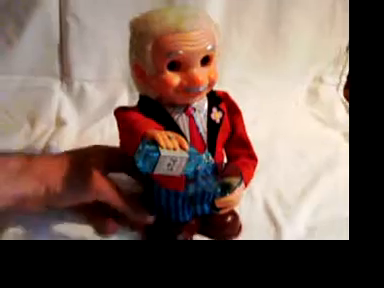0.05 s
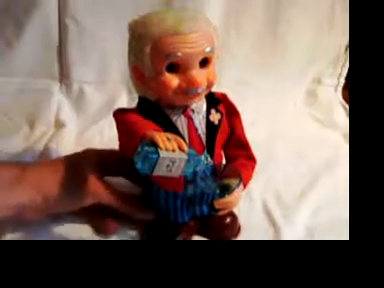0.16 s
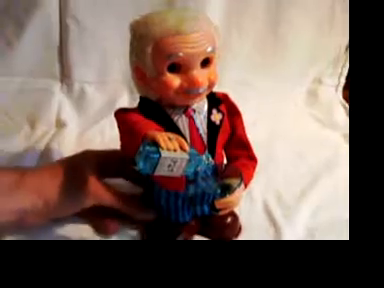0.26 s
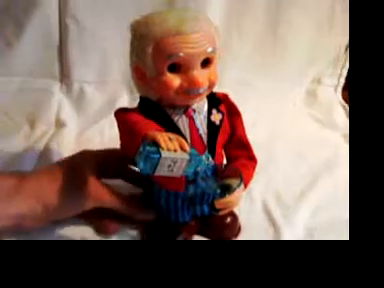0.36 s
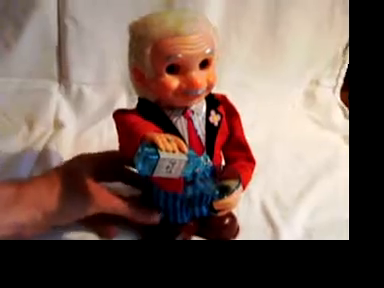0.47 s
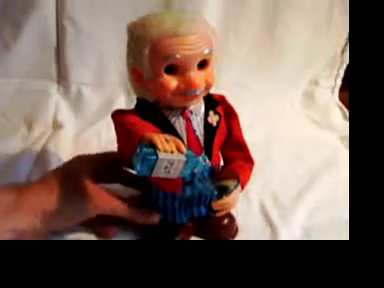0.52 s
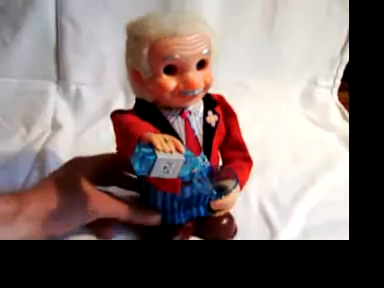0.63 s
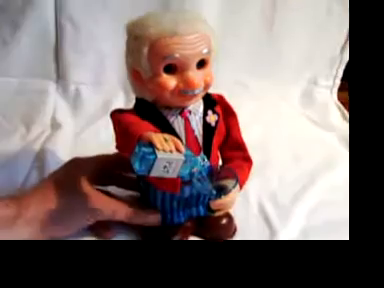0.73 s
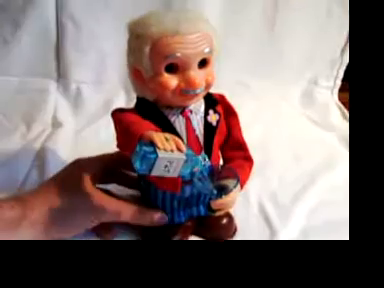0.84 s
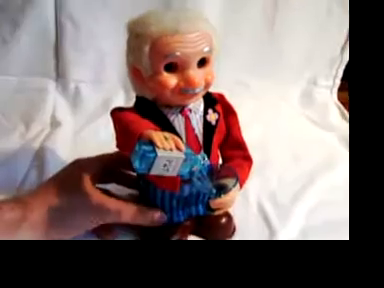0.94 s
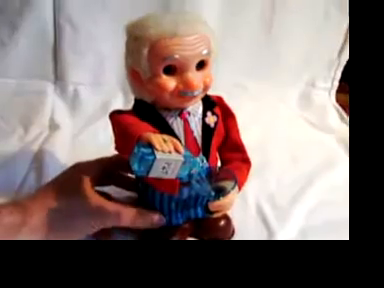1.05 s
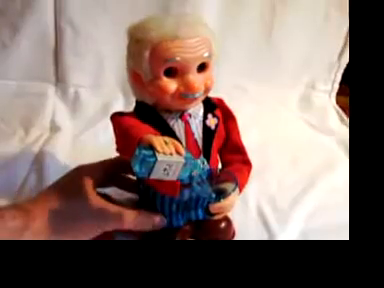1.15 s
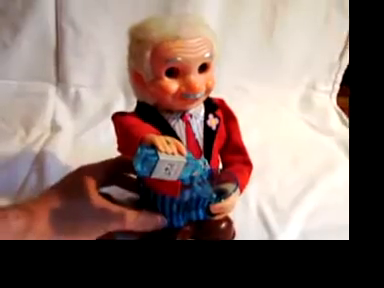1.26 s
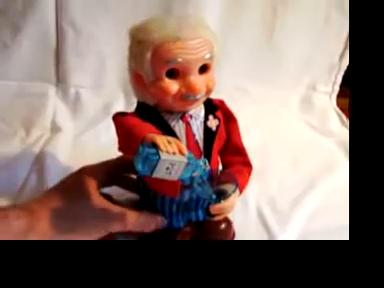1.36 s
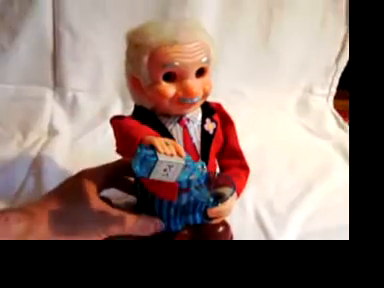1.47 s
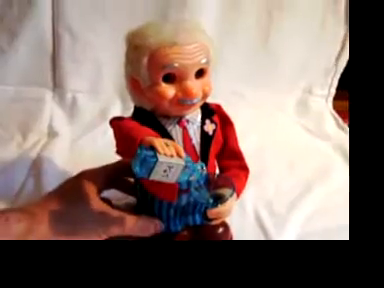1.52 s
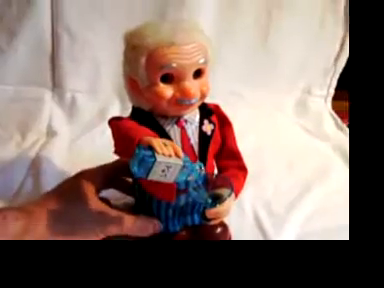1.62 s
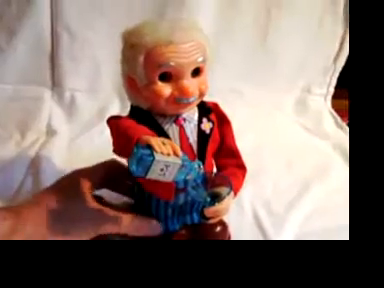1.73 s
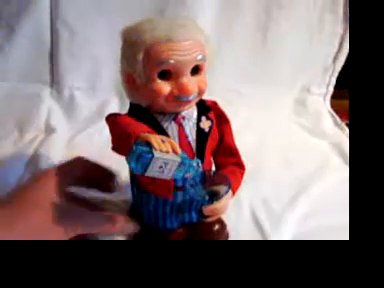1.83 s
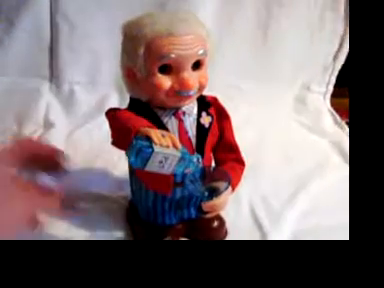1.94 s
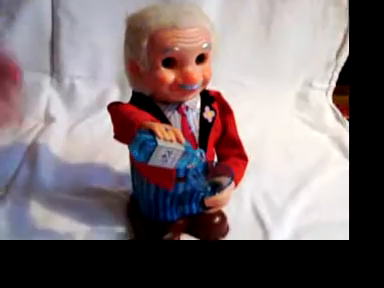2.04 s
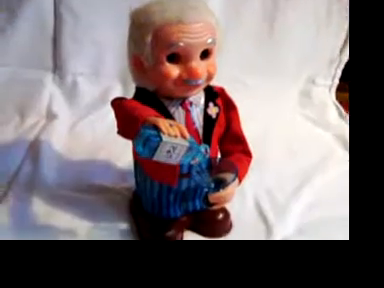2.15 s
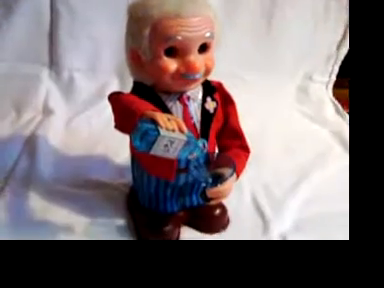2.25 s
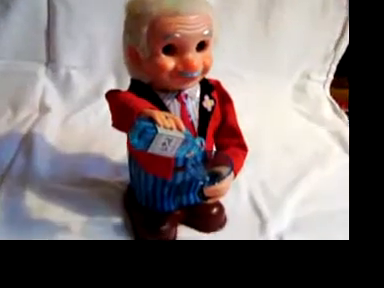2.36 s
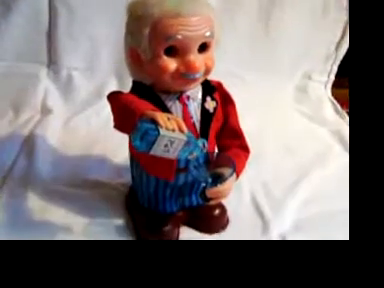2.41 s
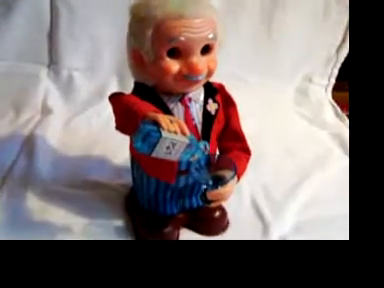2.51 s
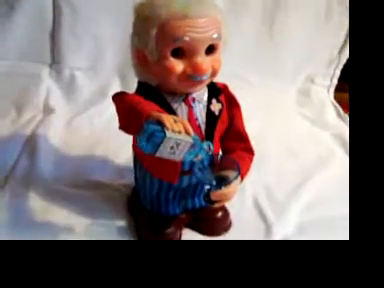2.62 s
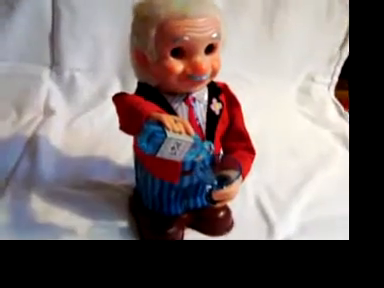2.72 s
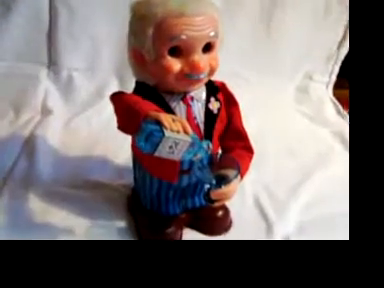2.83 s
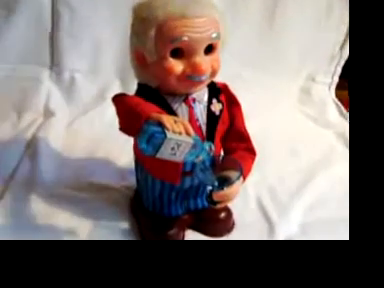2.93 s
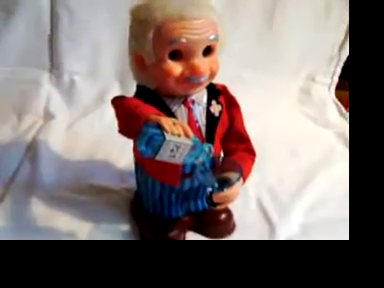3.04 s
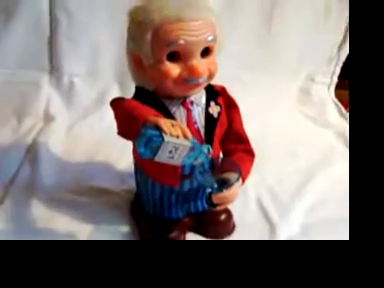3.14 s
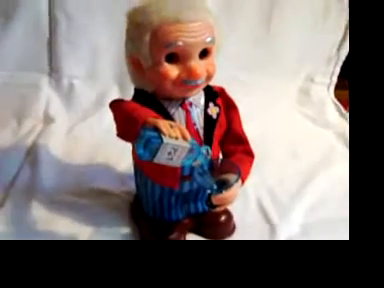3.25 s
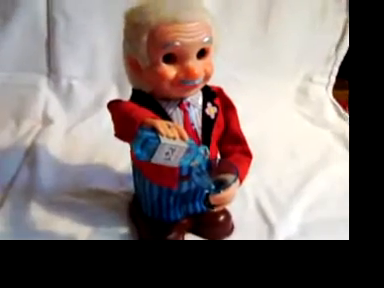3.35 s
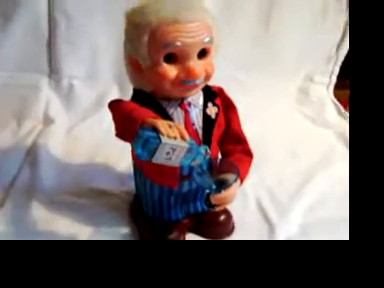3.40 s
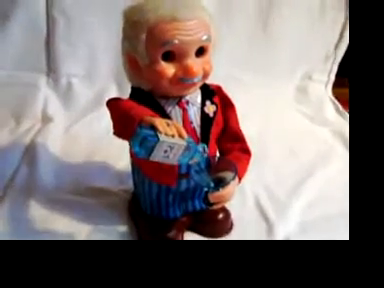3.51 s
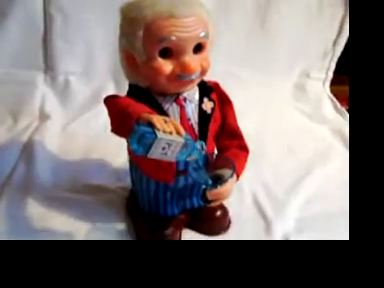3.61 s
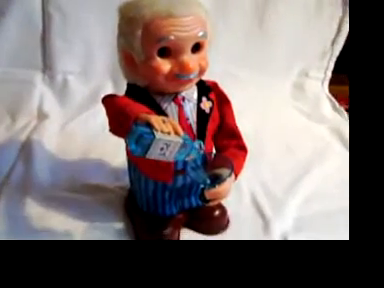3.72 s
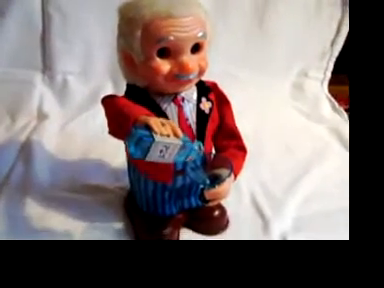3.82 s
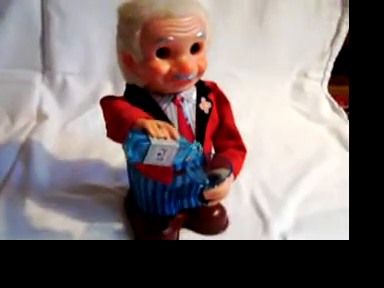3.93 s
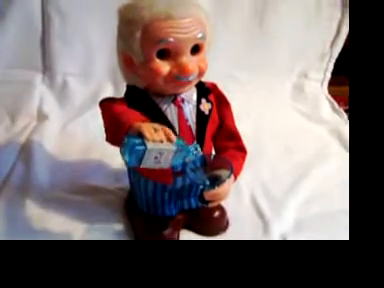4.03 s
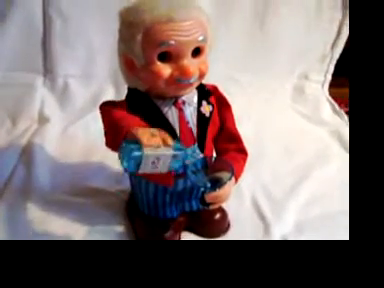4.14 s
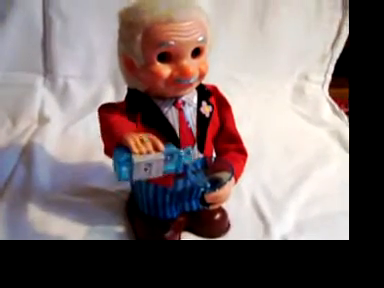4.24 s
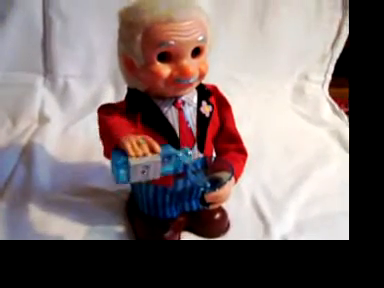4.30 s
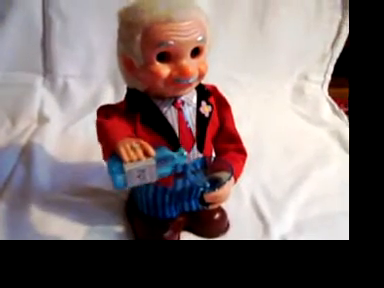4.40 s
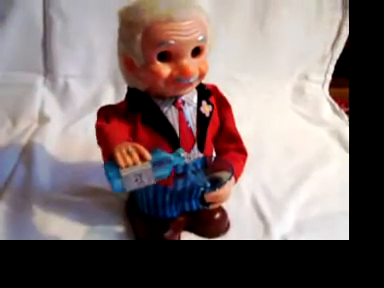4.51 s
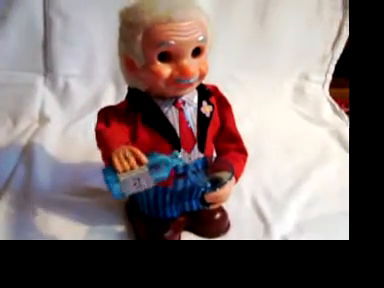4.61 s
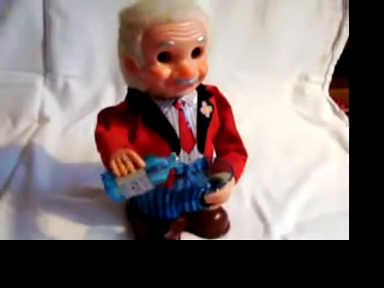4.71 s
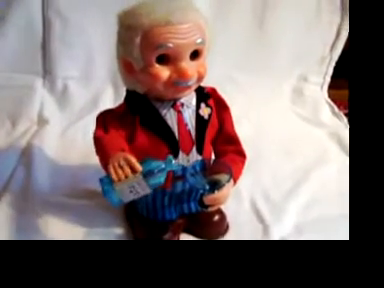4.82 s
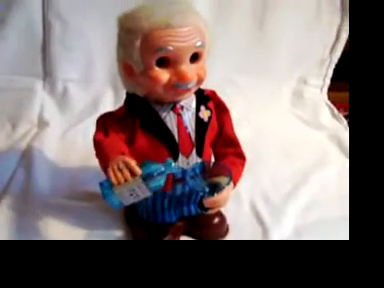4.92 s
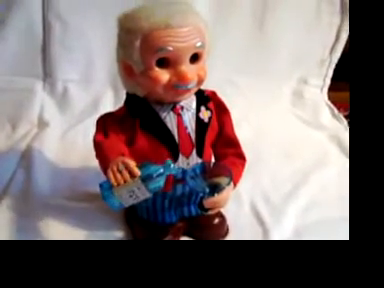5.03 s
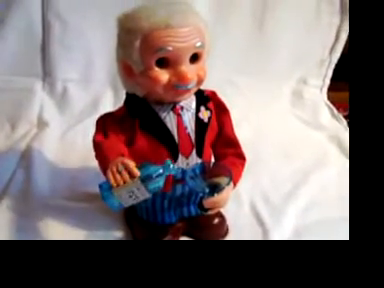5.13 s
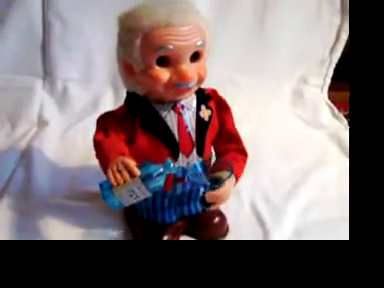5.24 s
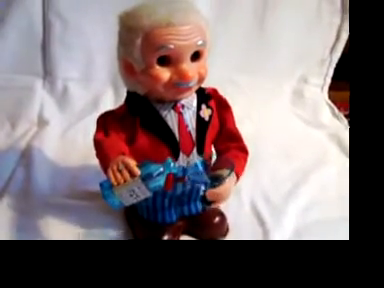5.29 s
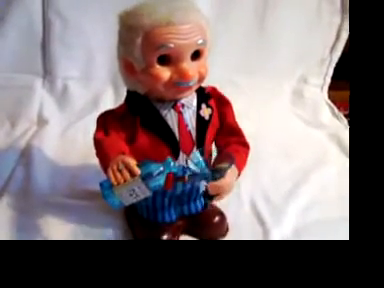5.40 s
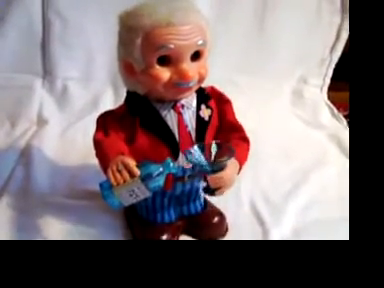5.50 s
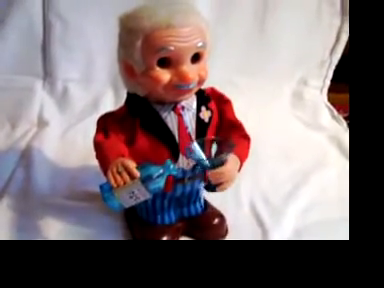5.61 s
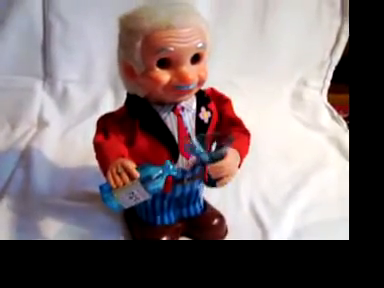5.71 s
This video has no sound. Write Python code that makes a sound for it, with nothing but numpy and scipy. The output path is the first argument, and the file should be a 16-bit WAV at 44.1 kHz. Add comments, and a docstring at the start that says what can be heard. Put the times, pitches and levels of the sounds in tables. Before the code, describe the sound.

A battery-operated tin doll is clicked on and runs with a humming motor, rattling gears and occasional knocks.

```python
"""Quiet room, close up: a hand clicks the switch of a battery-driven tin bartender doll.
The motor spins up; its shaft hums and its loose gears rattle the tin body, slowing and speeding up
with the load of the arms and grinding harder while a cam bears on them. The linkage knocks now and
then. The narrow-band microphone channel overloads on the sharpest peaks."""
import sys
import numpy as np
from scipy import signal
from scipy.fft import rfft, irfft
from scipy.io import wavfile

SR = 44100
rng = np.random.default_rng(int(sys.argv[2]) if len(sys.argv) > 2 else 0)


def log_audio(samples):
    """Write samples as a 16-bit WAV file to the path given in sys.argv[1]."""
    # one column per channel
    frames = np.atleast_2d(samples).T
    # limit to full scale, then quantise
    limited = np.clip(frames, -1, 1)
    pcm = np.round(limited * 32767).astype(np.int16)
    wavfile.write(sys.argv[1], SR, pcm)


N = 254016
TIME = np.arange(N) / SR

# room noise spectrum: f/Hz, relative density/dB
ROOM_SPECTRUM = [(15, -31.5), (25, -9.5), (86, -14.5), (118, -3.5), (156, -8.5), (215, -6), (283, -9.5),
                 (315, -15), (462, -5.5), (610, -8.5), (664, -7.5), (840, -17), (2830, -21), (4060, -32.5),
                 (5280, -56), (8930, -120)]
# finger and switch clicks: t/s, peak/dB, spectral centre/Hz, spread/octaves, scrape decay/s
SWITCH_CLICKS = [(0.526, -11, 2080, 0.58, 0.00029), (0.7120, -37, 1700, 1.3, 0.0018),
                 (0.76, -16, 1330, 0.87, 0.0053), (0.78, -27, 1210, .7, 0.0051),
                 (0.981, -3, 850, 1.57, 0.000082), (0.993, -24, 1000, 1.1, .001),
                 (1.032, -11, 750, 1.55, 0.00071), (1.287, -9, 2040, 0.59, 0.0014)]
# switch plate modes: f/Hz, level/dB, t60/s
SWITCH_MODES = [(627, 2.5, 0.025), (610, -18, 0.19), (850, -23, 0.0028), (1035, 2, 0.007),
                (1636, -0.5, 0.012), (2400, -3.5, 0.0081), (2720, -7.5, 0.013), (3650, -0.5, 0.0056)]
# arm linkage knocks: t/s, thud level/dB, thud f/Hz, thud decay/s, clack level/dB
LINKAGE_KNOCKS = [(1.469, -23, 85, 0.0035, -4), (3.0075, -3, 453, .0025, 5),
                  (3.086, -9.5, 427, 0.0024, -31), (3.174, -11, 356, 0.0021, -26),
                  (3.92, -28, 60, 0.011, -24), (5.052, -11.5, 480, 0.0032, -6)]
# tin body resonances: f/Hz, half width/Hz, level/dB
TIN_MODES = [(186, 81, -28), (406, 122, -20), (544, 110, -8.5), (709, 59, -8), (770, 23, -12.5),
             (934, 200, -16), (1117, 72, -4.5), (1210, 130, -14), (1398, 75, -4.5), (1453, 20, -9.5),
             (1572, 104, -4), (1676, 64, -7), (1793, 71, -3.5), (1909, 46, -1.5), (2040, 23, -3.5),
             (2121, 48, -2.5), (2256, 221, -1.4), (2370, 63, -3.5), (2390, 13, -9.5), (2537, 68, -5),
             (2640, 100, -9.5), (2827, 15, -7), (2920, 234, -9), (3045, 70, -9), (3257, 200, -11),
             (3480, 74, -16), (3656, 160, -13.5), (3898, 223, -15)]
# running speed under the load of the arms: t/s, shaft rate/Hz
SHAFT_SPEED = [(1.44, 187), (1.7, 189.5), (1.82, 182), (2.08, 185), (2.43, 171), (2.67, 198.5), (2.83, 195),
               (3.1, 197), (3.25, 193), (3.57, 195), (3.75, 199), (4.15, 196), (4.5, 198), (4.77, 194),
               (5.0, 182), (5.25, 193), (5.5, 180.5), (5.76, 180.5)]
# shell resonances, one per hum order: level at resonance/dB, f/Hz, half width/Hz
HUM_RESONANCES = [(-34.5, 350, 110), (-30.5, 588, 24), (-30.5, 737, 28), (-28.5, 1348, 32)]
# cam bearing on the gears: start t/s, length/s, boost/dB
CAM_STROKES = [(1.29, 0.46, 1.5), (2.058, 0.24, 1.06), (2.359, 0.19, 1.58), (2.63, 1.73, 1.75),
               (2.647, 0.1, 2.1), (2.944, 0.12, 1.5), (3.763, 0.16, 2.5), (4.345, 0.14, 3),
               (4.729, 0.063, 0.8), (5.303, 0.22, 1.2), (5.701, 0.069, 3)]
# rattle gain at 1-2 kHz: t/s, gain/dB
RATTLE_MID_GAIN = [(1.4, 1.1), (1.9, -2.1), (2.8, 0.2), (4.3, 0.5), (5.1, -0.1), (5.6, -3.2)]

# orders in cycles per shaft turn
HUM_ORDERS = (2, 3, 4, 7)
WHEEL_ORDERS, WHEEL_DB = (.4, .6, 1, 1.2), (-50, -53, -52, -50)  # at nominal speed
GEAR_ORDERS, GEAR_DB = (6, 8, 9.8, 12), (-23.5, -17.5, -21.5, -12.5)  # re rattle
MOTOR_ON_S, NOMINAL_HZ = 1.272, 190


def amp(db):
    """dB to gain."""
    return 10 ** (np.asarray(db) / 20)


def unit_rms(x):
    """Scale to rms 1."""
    return x / np.sqrt(np.mean(x ** 2) + 1e-20)


def curve(rows):
    """Interpolate (t, value) rows per sample."""
    return np.interp(TIME, *np.transpose(rows))


def add(mix, start_s, sound):
    """Mix in at start_s."""
    part = mix[round(start_s * SR):][:len(sound)]
    part += sound[:len(part)]


def drift(hz):
    """Slow noise, rms 1, up to about hz."""
    f = np.fft.rfftfreq(N, 1 / SR)
    return unit_rms(irfft(rfft(rng.standard_normal(N)) * np.exp(-(f / hz) ** 2), N))


def band(x, lo_hz, hi_hz):
    """Brick-wall band-pass."""
    f = np.fft.rfftfreq(N, 1 / SR)
    return irfft(rfft(x) * ((f >= lo_hz) & (f < hi_hz)), N)


def room(level_db=-40, flutter_db=2.0):
    """Dull room noise; the level flutters slightly."""
    hz, db = np.transpose(ROOM_SPECTRUM)
    colour = amp(np.interp(np.log(np.fft.rfftfreq(N, 1 / SR) + 1), np.log(hz + 1), db))
    gain = amp(level_db + flutter_db * drift(24))
    return gain * unit_rms(irfft(rfft(rng.standard_normal(N)) * colour, N))


def switch_clicks(scrape=0.23, echo_db=-43, echo_s=0.023, low_cut_hz=330):
    """Snap and scrape ring the switch plate; the room throws a little back."""
    out, t = np.zeros(N), np.arange(SR // 8) / SR
    highpass = signal.butter(2, low_cut_hz, "high", fs=SR)  # clicks carry no deep bass
    echo = amp(echo_db) * np.exp(-t / echo_s)
    for start_s, peak_db, centre_hz, spread_oct, scrape_s in SWITCH_CLICKS:
        ring = np.zeros(len(t))
        for k, (hz, mode_db, t60_s) in enumerate(SWITCH_MODES):
            weight = np.exp(-.5 * (np.log2(hz / centre_hz) / spread_oct) ** 2)
            ring += (-1) ** k * weight * amp(mode_db - 60 * t / t60_s) * np.sin(2 * np.pi * hz * t)
        force = (t == 0) + rng.standard_normal(len(t)) * (scrape * np.exp(-t / scrape_s) + echo)
        snap = signal.lfilter(*highpass, signal.fftconvolve(force, ring))
        add(out, start_s, amp(peak_db) * snap / abs(snap).max())
    return out


def linkage_knocks(clack_hz=860, clack_s=0.0013, low_cut_hz=70):
    """A lever drops against its stop: dull thud, hollow clack from the shell."""
    out, t = np.zeros(N), np.arange(SR // 10) / SR
    for start_s, thud_db, thud_hz, decay_s, clack_db in LINKAGE_KNOCKS:
        age = 2 * t / decay_s
        thud = amp(thud_db) * age * np.exp(1 - age) * np.sin(2 * np.pi * thud_hz * t)
        clack = amp(clack_db) * np.exp(-t / clack_s) * np.sin(2 * np.pi * clack_hz * t)
        add(out, start_s, thud + clack)
    highpass = signal.butter(1, low_cut_hz, "high", fs=SR)  # knocks carry little deep bass
    return signal.lfilter(*highpass, out)


def shaft_tone(turns, order, waver=0.23):
    """One shaft order, wavering in strength."""
    return np.sqrt(2) * np.cos(2 * np.pi * (order * turns + rng.random())) * (1 + waver * drift(13.5))


def wheel_drone(turns, excess_hz, db_per_hz=.5):
    """Low drone of the first wheel, louder with speed."""
    return sum(amp(db + db_per_hz * excess_hz) * shaft_tone(turns, order)
               for order, db in zip(WHEEL_ORDERS, WHEEL_DB))


def shaft_hum(turns, shaft_hz):
    """Each order swells as the speed carries it through a shell resonance."""
    return sum(amp(db) / np.hypot(1, (order * shaft_hz - hz) / width_hz)
               * shaft_tone(turns, order, waver=0.32)
               for order, (db, hz, width_hz) in zip(HUM_ORDERS, HUM_RESONANCES))


def cam_load_db(attack_s=0.015, release_s=0.062):
    """Extra grinding: each cam stroke sets in, holds, lets go."""
    load_db = np.zeros(N)
    for start_s, length_s, boost_db in CAM_STROKES:
        rise = (TIME - start_s) / attack_s
        fall = (start_s + length_s - TIME) / release_s + .5
        load_db += boost_db * np.clip(np.minimum(rise, fall), 0, 1)
    return load_db


def gear_whine(turns, load_db):
    """Mesh tones, louder under cam load."""
    mesh = sum(amp(db) * shaft_tone(turns, order) for order, db in zip(GEAR_ORDERS, GEAR_DB))
    return amp(load_db) * mesh


def tin_body(force, taps=4096):
    """Overlapping sheet-metal resonances as a minimum-phase filter."""
    f = abs(np.fft.fftfreq(taps, 1 / SR))
    power = sum(amp(db) ** 2 / (1 + ((f - hz) / width_hz) ** 2) ** 2 for hz, width_hz, db in TIN_MODES)
    log_response = np.conj(signal.hilbert(.5 * np.log(power)))
    ring = np.fft.ifft(np.exp(log_response)).real
    return signal.oaconvolve(force, ring)[:N]


def gear_rattle(turns, shaft_hz, load_db, hits_per_turn=30, scatter_db=2.5, flutter_db=0.52):
    """Loose teeth strike at random and ring the tin, harder once per shaft turn and per wheel turn."""
    struck = rng.random(N) < hits_per_turn * shaft_hz / SR
    sign = rng.choice([-1., 1.], N)
    force = amp(scatter_db * rng.uniform(-0.59, 1, N) - flutter_db * drift(22))
    shaft_throb = 1 + 0.077 * np.cos(2 * np.pi * turns)
    wheel_throb = 1 + 0.03 * np.cos(2 * np.pi * turns / 5)  # first wheel geared 5:1
    tin = tin_body(struck * sign * force * shaft_throb * wheel_throb)
    low, mid, high = band(tin, 0, 1000), band(tin, 1000, 2000), band(tin, 2000, SR)
    treble = mid * amp(curve(RATTLE_MID_GAIN)) + high
    loaded = low * amp(0.52 * load_db) + treble * amp(load_db)  # cams grind mostly in the treble
    return loaded / np.std((mid + high)[TIME > MOTOR_ON_S])


def motor(spin_up_s=.034, jitter=0.005474, gears_db=-15, gears_db_per_hz=-0.0113):
    """The shaft spins up; its speed drives rattle, whine, drone and hum."""
    spin = 1 - np.exp(-np.maximum(TIME - MOTOR_ON_S, 0) / spin_up_s)
    running_hz, load_db = curve(SHAFT_SPEED), cam_load_db()
    excess_hz = running_hz - NOMINAL_HZ
    shaft_hz = spin * running_hz * (1 + jitter * drift(29.9))
    turns = np.cumsum(shaft_hz) / SR
    gears = gear_rattle(turns, shaft_hz, load_db) + gear_whine(turns, load_db)
    gears *= amp(gears_db + gears_db_per_hz * excess_hz)
    return spin ** 1.1 * (gears + wheel_drone(turns, excess_hz) + shaft_hum(turns, shaft_hz))


def scene():
    """Doll over room noise, mono."""
    return (motor() + switch_clicks() + linkage_knocks() + room())[None]


def record(dry, open_s=.126, soft_limit=.83, hard_limit=.71, mic_edge_hz=4210, output_edge_hz=15900):
    """Microphone channel: fade-in, soft limit, narrow low-pass, hard clip, output low-pass."""
    mic_lowpass = signal.firwin(171, mic_edge_hz, window=("kaiser", 7), fs=SR)
    output_lowpass = signal.firwin(511, output_edge_hz, window=("kaiser", 9), fs=SR)
    opened = dry * np.clip((TIME - open_s) / .01, 0, 1)
    rounded = opened / (1 + (opened / soft_limit) ** 10) ** (1 / 10)
    narrow = signal.oaconvolve(rounded, mic_lowpass[None], "same")
    clipped = np.clip(narrow, -hard_limit, hard_limit)
    return signal.oaconvolve(clipped, output_lowpass[None], "same")


dry = scene()
out = record(dry)
log_audio(out)
```